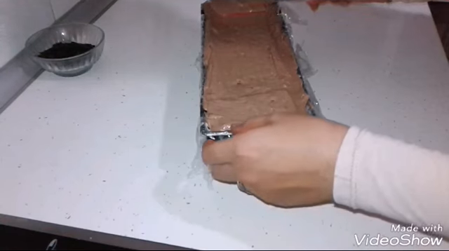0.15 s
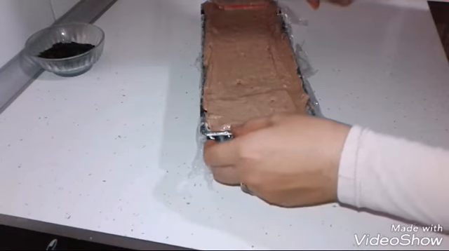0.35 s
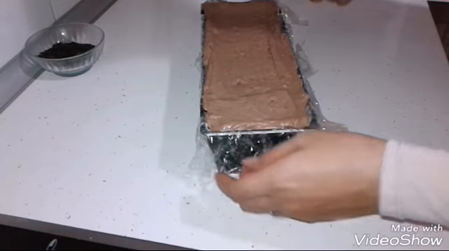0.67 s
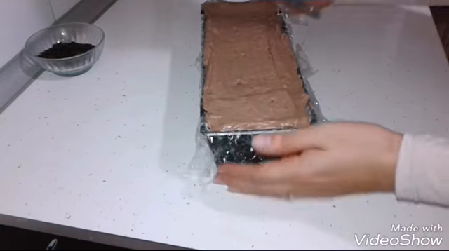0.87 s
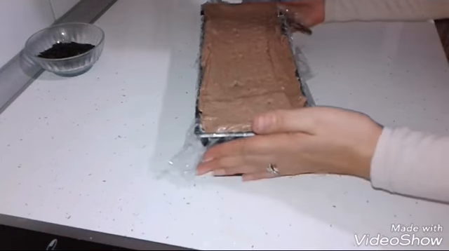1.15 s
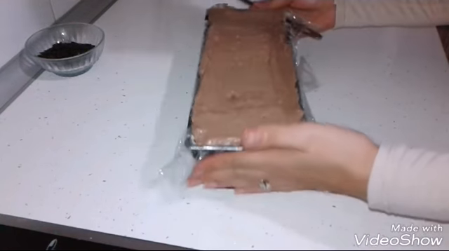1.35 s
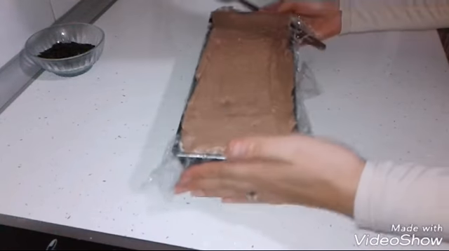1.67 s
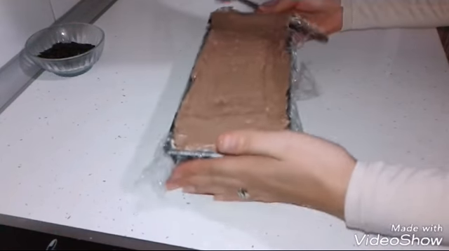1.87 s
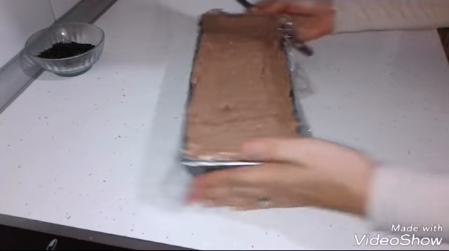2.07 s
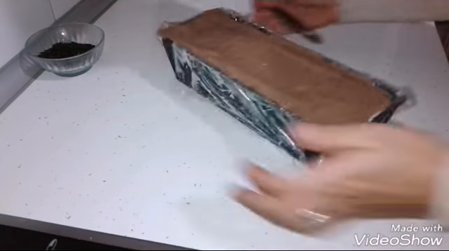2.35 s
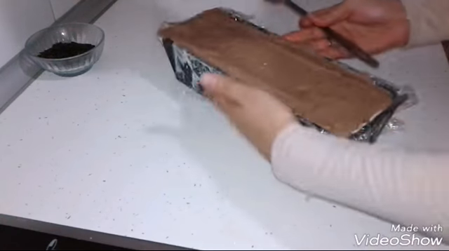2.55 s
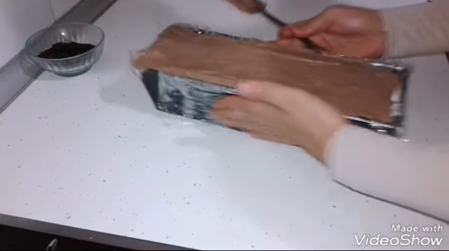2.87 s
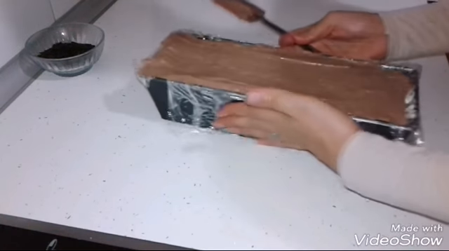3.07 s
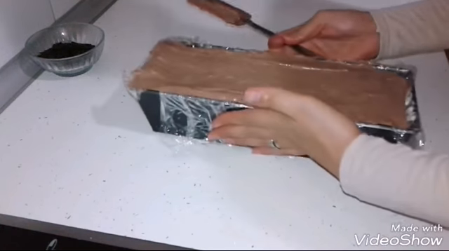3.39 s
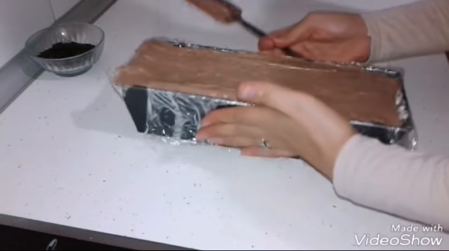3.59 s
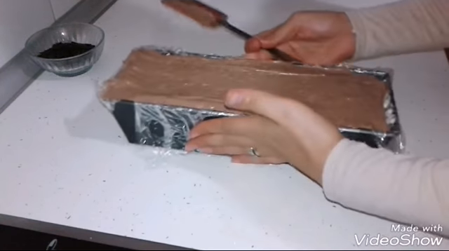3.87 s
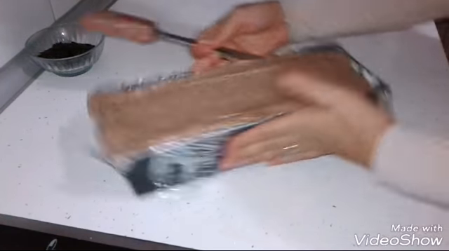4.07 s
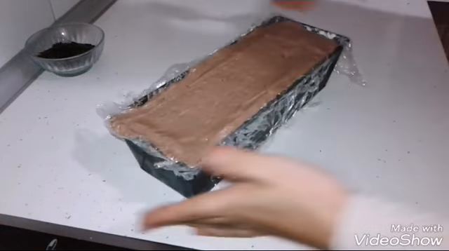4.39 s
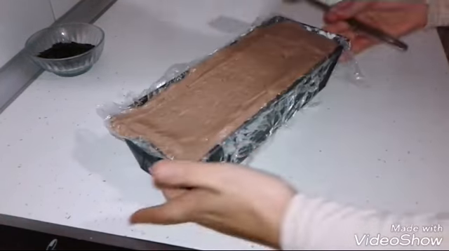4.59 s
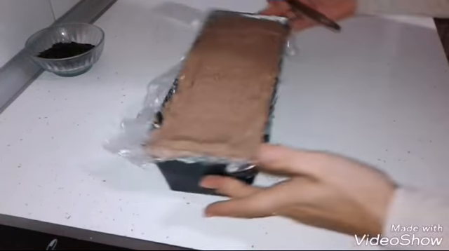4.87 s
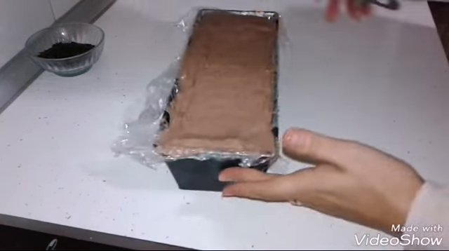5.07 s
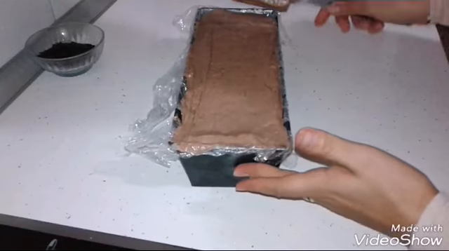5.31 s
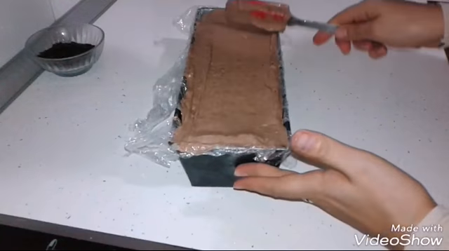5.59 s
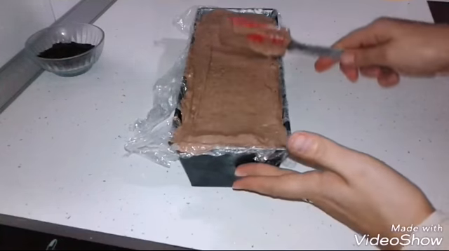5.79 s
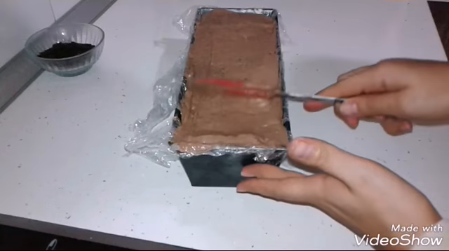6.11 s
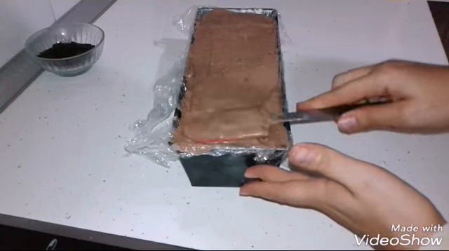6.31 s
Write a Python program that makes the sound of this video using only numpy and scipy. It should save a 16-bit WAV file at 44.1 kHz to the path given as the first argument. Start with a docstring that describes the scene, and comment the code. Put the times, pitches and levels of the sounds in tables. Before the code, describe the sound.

Close in a hard-walled kitchen, a heavy film-lined metal loaf pan is slid faintly, then knocked end-down on the counter in four fast, hard clacks. It turns with a crinkly swish, is shaken with rustling film, then knocked three more times on its side. Another swish and scrape follow, then near-quiet with soft handling.

```python
"""Loaf pan knocked on a kitchen counter

Close by in a hard-walled kitchen, a filled metal loaf pan lined with cling film is knocked: end to end, then side to side.
Each landing is a damped clack of decaying sines plus a metallic noise crack, with pan, worktop and room ringing on;
one edge often touches just before. Before, between and after the bouts the pan is slid; between them it is also shaken
on its overhanging film: shaped noise hisses and crinkles for the film and rumbles for the worktop.
Faint room tone, hum and handling lie behind."""
import sys
import numpy as np
from scipy import signal
from scipy.fft import rfft, irfft
from scipy.io import wavfile

SR = 44100
rng = np.random.default_rng(int(sys.argv[2]) if len(sys.argv) > 2 else 0)


def unload_wav(signal):
    """Save mono or channel-first audio to the path in sys.argv[1] as 16-bit WAV at rate SR, clipped to [-1, 1]."""
    wavfile.write(
        sys.argv[1],
        SR,
        np.round(np.clip(np.atleast_2d(signal).T, -1, 1) * 32767).astype(np.int16),
    )


N = 284445
T = np.arange(N) / SR
AGE = np.arange(2 * SR) / SR   # time since a landing, s


def from_db(db):
    """Amplitude factor of a level in dB."""
    return 10 ** (np.asarray(db) / 20)


def rms_one(x):
    """Scale to an rms of 1."""
    return x / np.sqrt(np.mean(x ** 2) + 1e-20)


def at_hz(points, hz):
    """Read a (frequency, value) table on a logarithmic frequency axis."""
    table = np.array(points)
    return np.interp(np.log(hz + 1), np.log(table[:, 0]), table[:, 1])


def coloured(x, spectrum):
    """Steady noise or grains given a spectrum; rms 1."""
    hz = np.linspace(0, SR / 2, len(x) // 2 + 1)
    return rms_one(irfft(rfft(x) * from_db(at_hz(spectrum, hz)), len(x)))


def lowpass(x, hz, order=2):
    """Butterworth low-pass, kept below half the sample rate."""
    sos = signal.butter(order, min(hz, SR / 2 - 1), fs=SR, output="sos")
    return signal.sosfilt(sos, x)


def dying(t60):
    """Exponential decay that loses 60 dB in t60 seconds."""
    return np.exp(-np.log(1000) * AGE / t60)


def flutter(per_s):
    """Random wander: straight lines between normal draws, per_s of them a second."""
    knots = np.arange(0, T[-1] + 1, 1 / per_s)
    return np.interp(T, knots, rng.standard_normal(len(knots)))


def add(track, s, sound):
    """Mix a sound into the track from s seconds on."""
    at = round(s * SR)
    track[at:at + len(sound)] += sound[:N - at]


# room tone of the kitchen: (f/Hz, relative level/dB per Hz)
ROOM_TONE_COLOUR = [(25, -12), (70, -5.5), (140, -0.5), (280, -1), (550, -4.5), (1050, -5), (2000, -10.5),
                    (3500, -13.5), (15000, -19)]
ROOM_TONE_DB = -70   # before its slight wavering


def room_tone(waver_db):
    """Faint, slightly wavering kitchen background: shaped noise."""
    noise = coloured(rng.standard_normal(N), ROOM_TONE_COLOUR)
    return from_db(ROOM_TONE_DB) * noise * from_db(waver_db * flutter(per_s=28))


# lines of the appliance hum: (f/Hz, rms level/dB)
HUM_LINES = [(224.1, -84.5), (336, -85), (448.1, -88), (560.1, -89.5), (672.3, -84.5), (737, -82.5),
             (970, -91)]


def hum():
    """A motor somewhere in the kitchen: steady sines, each drifting a little in phase."""
    out = np.zeros(N)
    for hz, db in HUM_LINES:
        phase = 2 * np.pi * hz * T + 0.6 * flutter(per_s=3.1)
        out += from_db(db) * np.sqrt(2) * np.sin(phase)
    return out


# dull rubbing of hand and spatula: (f/Hz, relative level/dB per Hz)
HANDLING_COLOUR = [(100, -12), (350, -9), (550, -1.5), (800, -2), (1200, -0.5), (1800, -8.5), (3000, -18.5),
                   (8000, -24)]
# the hand settles against the pan: (t/s, level/dB)
TOUCHES = [(5.115, -62.5), (5.28, -66.5), (5.56, -68)]
TOUCH_T60_S = 0.381
HANDLING_FROM_S, HANDLING_FADE_IN_S = 4.4, 0.15
HANDLING_DB = -74.5   # before its unevenness


def handling(uneven_db):
    """Soft, dull rubbing of hand and spatula, with a few light touches."""
    fade_in = np.clip((T - HANDLING_FROM_S) / HANDLING_FADE_IN_S, 0, 1)
    rub_level = from_db(HANDLING_DB + uneven_db * flutter(per_s=28)) * fade_in
    touch_level = np.zeros(N)
    for s, db in TOUCHES:
        add(touch_level, s, from_db(db) * dying(TOUCH_T60_S))
    noise = coloured(rng.standard_normal(N), HANDLING_COLOUR)
    return np.hypot(rub_level, touch_level) * noise


# faint delayed copies of the film and crack: (delay t/s, level/dB)
TREBLE_COMB = [(.0021, -20.5), (.0047, -13), (.0079, -16)]


def treble_comb(x):
    """Three faint delayed copies give the film and crack an uneven, slightly hollow treble."""
    copies = sum(from_db(db) * np.interp(T - delay, T, x, left=0) for delay, db in TREBLE_COMB)
    power = 1 + sum(from_db(db) ** 2 for _, db in TREBLE_COMB)
    return (x + copies) / np.sqrt(power)


# pushes that slide or turn the pan:
# (t/s at full speed, run-up t/s, film hiss level/dB, level/dB of the rumble of its weight)
SLIDES = [(.70, 0.049, -65, -64), (.82, 0.21, -72, -62), (1.196, 0.069, -57, -75.5),
          (1.36, 0.39, -67.5, -76), (2.385, 0.32, -42.5, -55), (3.56, 0.81, -59, -62),
          (4.207, 0.1, -41, -48), (4.315, 0.16, -44.5, -52.5), (4.759, 0.041, -58.5, -79),
          (4.885, 0.14, -62, -67), (5.03, 0.24, -54.5, -71), (5.915, .17, -67, -82)]
RUN_UP_DB = 18.5   # a push gains this much, evenly in dB, over its run-up
SLIDE_HOLD_S = 0.021   # a push stays at full speed this long
SLIDE_ECHO_DB, SLIDE_ECHO_T60_S = -10, 0.62   # the room carries it on after the stop


def pushes(stop_s):
    """Speed of each push, one row each: it runs up, holds, stops, and lingers in the room."""
    rows = []
    for s, run_up_s, *_ in SLIDES:
        since = np.maximum(T - s - SLIDE_HOLD_S, 0)
        stop = np.exp(-since / stop_s)
        echo = from_db(SLIDE_ECHO_DB - 60 * since / SLIDE_ECHO_T60_S)
        run_up = from_db(-RUN_UP_DB * np.clip((s - T) / run_up_s, 0, 10))
        rows.append(run_up * np.maximum(stop, echo))
    return np.array(rows)


# between the bouts the pan is shaken to and fro to level the filling
SHAKE_FROM_S, SHAKE_TO_S = 2.982, 3.305   # at full effort
SHAKE_GROWS_DB_PER_S, SHAKE_FADES_DB_PER_S = 36.5, 77
SHAKES_PER_S, SHAKE_BEAT_S = 10, 3.03   # rate of the strokes, middle of one stroke
SHAKE_SWING_DB = 2.5   # each stroke swings this far up and down
SHAKE_HISS_DB, SHAKE_RUMBLE_DB = -45, -56   # full effort, midway through the swing


def shaking_db():
    """Speed of the shaken pan in dB: even strokes about a swell that grows, holds at 0 dB and dies away."""
    growing = -SHAKE_GROWS_DB_PER_S * np.maximum(SHAKE_FROM_S - T, 0)
    fading = -SHAKE_FADES_DB_PER_S * np.maximum(T - SHAKE_TO_S, 0)
    strokes = SHAKE_SWING_DB * np.cos(2 * np.pi * SHAKES_PER_S * (T - SHAKE_BEAT_S))
    return growing + fading + strokes


def rubbing(push_db, shake_db, stop_s):
    """Gain of a friction sound: pushes and shaking add in power."""
    push_power = from_db(push_db) ** 2 @ pushes(stop_s) ** 2
    return np.sqrt(push_power + from_db(shake_db) ** 2)


# rumble of the worktop under the sliding pan: (f/Hz, relative level/dB per Hz)
DRAG_COLOUR = [(30, -18.5), (48, -14), (60, -4), (78, -13.5), (115, -1.5), (300, 1.5), (500, -6),
               (1000, -7), (2000, -15), (5000, -37)]


def drag(judder_db, follows):
    """The heavy pan rubs unevenly and the worktop rumbles, following a share of the shaking's dB course."""
    rumble_db = [row[3] for row in SLIDES]
    level = rubbing(rumble_db, SHAKE_RUMBLE_DB + follows * shaking_db(), stop_s=0.068)
    rumble = coloured(rng.standard_normal(N), DRAG_COLOUR)
    return level * rumble * from_db(judder_db * flutter(per_s=20))


# film hiss: (f/Hz, relative level/dB per Hz)
FILM_COLOUR = [(300, -8), (900, -15), (1600, -10.5), (2600, -10), (4000, -7.5), (5000, -3), (6100, -2),
               (7500, -7.5), (10000, -14.5), (15000, -21)]


def film(per_s, size_db, smooth_db, flutter_db):
    """Countless tiny slips of the film blur to a hiss, with a few sharper crinkles."""
    size = from_db(size_db * np.minimum(rng.exponential(1, N), 5))
    direction = rng.choice([-1, 1], N)
    slips_now = rng.random(N) < per_s / SR
    crinkles = rms_one(size * direction * slips_now)
    smooth = from_db(smooth_db) * rng.standard_normal(N)
    hiss = coloured(crinkles + smooth, FILM_COLOUR)
    hiss_db = [row[2] for row in SLIDES]
    level = rubbing(hiss_db, SHAKE_HISS_DB + shaking_db(), stop_s=0.04)
    return hiss * level * from_db(flutter_db * flutter(per_s=110))


# single snaps of the film: (t/s, level/dB at the start)
SNAPS = [(2.397, -37), (2.973, -41.5), (3.141, -36)]


def snaps():
    """A fold of film lets go with a short tick of decaying noise."""
    out = np.zeros(N)
    for s, db in SNAPS:
        noise = coloured(rng.standard_normal(len(AGE)), FILM_COLOUR)
        add(out, s, from_db(db) * noise * dying(t60=0.029))
    return out


# decay of the hard-walled room: (f/Hz, t60/s)
ROOM_T60 = [(60, 0.38), (160, 0.44), (420, .44), (1100, .48), (3000, .47), (7000, .46), (14000, 0.48)]


def room_tail(spectrum, build_s):
    """Reflections crowd in within milliseconds, then each octave dies at its own rate."""
    bins = rfft(coloured(rng.standard_normal(len(AGE)), spectrum))
    hz = np.linspace(0, SR / 2, len(bins))
    octave = np.round(np.log2(np.maximum(hz, 64)))   # everything low shares one band
    tail = np.zeros(len(AGE))
    for k in np.unique(octave):
        band = irfft(bins * (octave == k))
        tail += band * dying(at_hz(ROOM_T60, 2 ** k))
    return tail * (1 - np.exp(-AGE / build_s))


# ringing of pan, worktop and room:
# (nominal f/Hz, level/dB landing on an end, level/dB landing on a side, t60/s)
RINGING_MODES = [(61.25, -39.5, -43.5, 1.05), (109.9, -37, -36.5, 0.8), (142.5, -33, -30.5, 0.59),
                 (210.4, -31.5, -31.5, 0.54), (257.8, -30, -28, 0.37), (288.2, -36, -29.5, 0.3),
                 (356, -30.5, -32, .4), (376.3, -29.5, -36.5, .35), (435, -26.5, -24, 0.28),
                 (532, -24.5, -21, 0.29), (581.5, -22, -32, .34), (630, -25.5, -25, .32),
                 (722, -31.5, -25, 0.37), (804.4, -22, -34.5, 0.24), (878, -24, -31, 0.26),
                 (940, -24.5, -32, 0.12), (1012, -32, -25, 0.28), (1065, -30.5, -23, 0.38),
                 (1152, -28.5, -27, 0.38), (1195, -28.5, -27.5, .3), (1265, -30, -33, .4),
                 (1288, -31.5, -37.5, .33), (1696, -32.5, -36, .38), (1810, -31.5, -37, 0.26)]
BASE_HZ, BASE_WIDTH_HZ = 486, 270   # where the base drums when it slaps down broadly


def ringing(on_side, drum_db, scatter_db, build_s, phase_spread, detune):
    """Long modes; the landing edge sets which speak, and grip and filling shift their pitch a little."""
    out = np.zeros(len(AGE))
    chances = rng.standard_normal((len(RINGING_MODES), 3))
    for (hz, end_db, side_db, t60), (luck, shift, grip) in zip(RINGING_MODES, chances):
        edge_db = side_db if on_side else end_db
        drumming_db = drum_db * np.exp(-((hz - BASE_HZ) / BASE_WIDTH_HZ) ** 2)
        gain = from_db(edge_db + drumming_db + scatter_db * luck)
        # the point of contact varies, which shifts the phase of short waves most
        phase = phase_spread * shift * hz / BASE_HZ
        pitch_hz = hz * (1 + detune * grip)
        out += gain * np.sin(2 * np.pi * pitch_hz * AGE + phase) * dying(t60)
    return out * (1 - np.exp(-AGE / build_s))


def two_corners(sound, second_db, lag_s):
    """A second corner lands just after the first, with little weight and so little bass; it colours each landing."""
    second = np.interp(AGE - lag_s, AGE, sound, left=0)
    thin = second - lowpass(second, hz=350, order=1)
    return sound + from_db(second_db) * thin


# the pan's base, damped by the filling: (f/Hz, level/dB, t60/s)
CLACK_MODES = [(139, -24.5, 0.074), (316, -13.5, .028), (646, -6, 0.015), (1130, -5.5, 0.016),
               (1800, -8.5, 0.0081), (3340, -21, .006)]


def base_clack():
    """Short modes of the filled base, neighbours starting in opposite directions."""
    out = np.zeros(len(AGE))
    for k, (hz, db, t60) in enumerate(CLACK_MODES):
        out += (-1) ** k * from_db(db) * np.sin(2 * np.pi * hz * AGE) * dying(t60)
    return out


# the free rim of the pan: (f/Hz, level/dB, t60/s)
RIM_MODES = [(2736, -42.5, .16), (3680, -47, .15), (4650, -46, .16), (5886, -44, 0.16), (5800, -45.5, .18),
             (5990, -41.5, .16)]


def rim_ring():
    """High modes of the free rim, each starting at a random phase."""
    out = np.zeros(len(AGE))
    for hz, db, t60 in RIM_MODES:
        phase = rng.uniform(0, 2 * np.pi)
        out += from_db(db) * np.sin(2 * np.pi * hz * AGE + phase) * dying(t60)
    return out


# landings: (t/s, strength level/dB, bass level/dB: more when it lands flat, metal crack level/dB)
KNOCKS = [(1.387, -16.5, -12, -6.5), (1.4654, -1.5, -1.5, 2), (1.6509, -1.5, 2, 0), (1.788, -3, -6.5, -1.5),
          (1.817, 2, -4, -0.5), (1.937, -10.5, 5, 0.5), (1.9514, 0, 1.5, -2), (2.067, -.5, -7.5, -2),
          (3.595, -12, -5.5, -13.5), (3.6394, -4.5, 7, 1.5), (3.756, -6.5, -0.5, -2), (3.8002, -3, 5.5, 2),
          (3.902, -4.5, -9, -2), (3.942, -1.5, 6, 6)]
# dull thuds of the pan rocking on its film while it is shaken:
# (t/s, strength level/dB, bass level/dB, crack level/dB)
THUDS = [(3.093, -6, -6, -2.5), (3.459, -9, -12, -8)]
# dense reverberant sound of a knock: (f/Hz, relative level/dB per Hz)
BOOM_COLOUR = [(30, -27), (60, -18), (80, -16.5), (110, -5), (230, -3), (350, -4), (550, 0.5), (900, -5),
               (1250, -4), (1800, -13.5), (2500, -20), (4000, -27), (8000, -51.5)]
# bright metal-on-counter contact: (f/Hz, relative level/dB per Hz)
CRACK_COLOUR = [(800, -15), (2000, 0), (3500, -1.5), (5000, -0.5), (6200, 0.5), (8000, -8), (10000, -13),
                (15000, -17)]
TURNED_S = 2.8   # landings are on an end before this, on a side after
THUD_HZ = 300   # hardness of the cushioned contact
# hardness of a 0 dB landing; a stronger blow is a shorter contact (dB of frequency per dB)
HARD_HZ, HARDER_PER_DB = 2540, 0.4
RING_DB, RING_PER_DB = -0.16, 0.34   # after-ring of a 0 dB landing; light touches ring less
DRUM_DB, DRUM_PER_BASS_DB = 1.2, 0.3   # the base drums more when it lands flat
# the crack reaches this many times higher than the hardness
CRACK_END_X, CRACK_SIDE_X = 3.6, 6.3


def knocks():
    """Each landing: a clack with ringing and room behind it, and a brief metallic crack with its own bright tail."""
    body, bright = np.zeros(N), np.zeros(N)
    clack = base_clack()
    for k, (s, strength_db, bass_db, crack_db) in enumerate(KNOCKS + THUDS):
        cushioned = k >= len(KNOCKS)
        on_side = s > TURNED_S
        hard_hz = THUD_HZ if cushioned else HARD_HZ * from_db(HARDER_PER_DB * strength_db)
        ring_gain = from_db(RING_DB + RING_PER_DB * strength_db)

        drum_db = DRUM_DB + DRUM_PER_BASS_DB * bass_db
        ring = ringing(on_side, drum_db, scatter_db=1.0, build_s=0.003, phase_spread=2.5, detune=0.003)
        boom = from_db(-18.0) * room_tail(BOOM_COLOUR, build_s=0.004)
        one_corner = from_db(-2.0) * clack + ring_gain * (boom + ring)
        hit = two_corners(one_corner, second_db=-12.0, lag_s=rng.uniform(0.0012, 0.0026))
        # a flat landing puts the whole weight into the worktop: more bass
        hit = hit + (from_db(bass_db) - 1) * lowpass(hit, hz=266, order=1)
        # a soft, long contact cannot excite the higher modes
        softened = lowpass(hit, hard_hz, order=2 if cushioned else 3)
        add(body, s, from_db(strength_db) * softened)

        contact = coloured(rng.standard_normal(len(AGE)), CRACK_COLOUR)
        crack = from_db(-13.0) * contact * dying(t60=0.015) * (1 - np.exp(-AGE / 0.0013))
        bright_tail = from_db(-31.5) * room_tail(CRACK_COLOUR, build_s=0.004)
        shimmer = ring_gain * (bright_tail + rim_ring())
        reach_hz = hard_hz * (CRACK_SIDE_X if on_side else CRACK_END_X)
        # the crack is brightest at the instant of contact; what rings on is duller
        metal = lowpass(crack, reach_hz) + lowpass(shimmer, reach_hz * 0.92)
        add(bright, s, from_db(strength_db + crack_db) * metal)
    return body + treble_comb(bright)


def scene():
    """Knocks, sliding film and dragging weight over the quiet kitchen."""
    background = room_tone(waver_db=1.77) + hum() + handling(uneven_db=4.0)
    rumble = drag(judder_db=2.0, follows=0.5)
    hiss = film(per_s=2600, size_db=3.0, smooth_db=1.0, flutter_db=1.38)
    rustle = treble_comb(hiss + snaps())
    return (background + rumble + rustle + knocks())[None, :]


CUTOFF_HZ = 15200


def record(dry):
    """One microphone channel: the highest peaks are rounded towards full scale, then the top is cut steeply."""
    rounded = np.tanh(dry)
    top_cut = signal.ellip(10, 0.1, 80, CUTOFF_HZ, fs=SR, output="sos")
    return signal.sosfilt(top_cut, rounded)


dry = scene()
out = record(dry)
unload_wav(out)
```